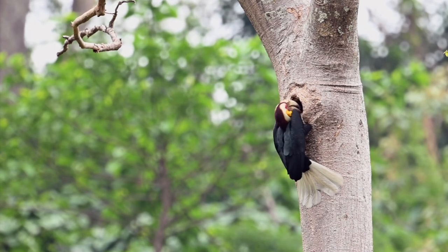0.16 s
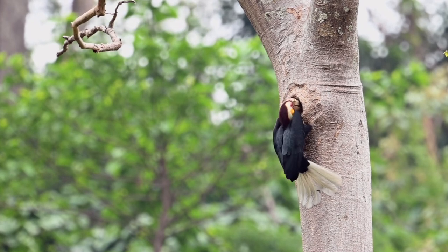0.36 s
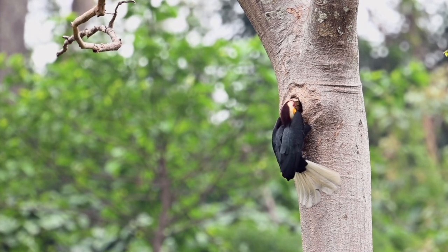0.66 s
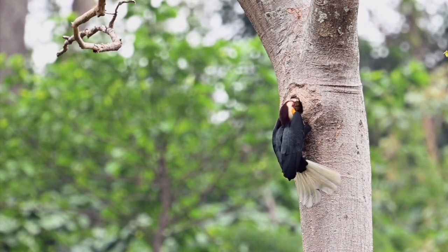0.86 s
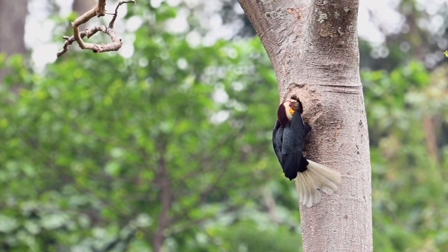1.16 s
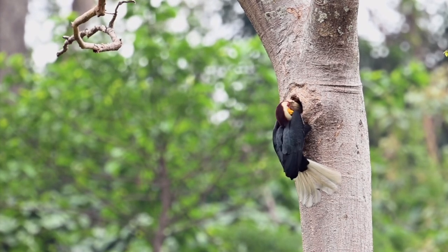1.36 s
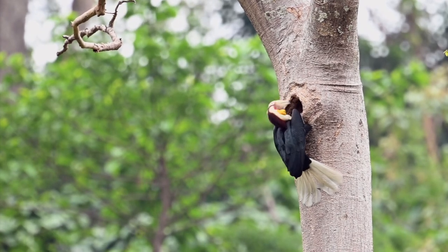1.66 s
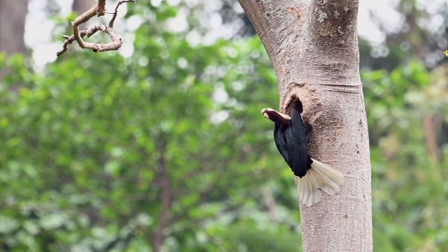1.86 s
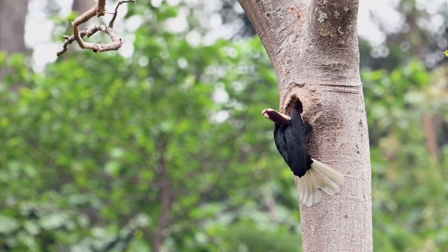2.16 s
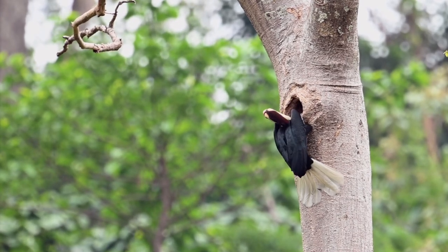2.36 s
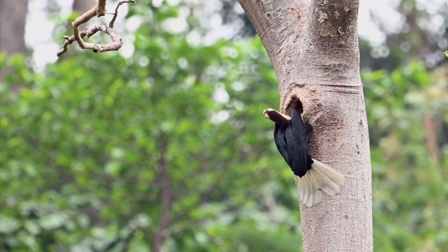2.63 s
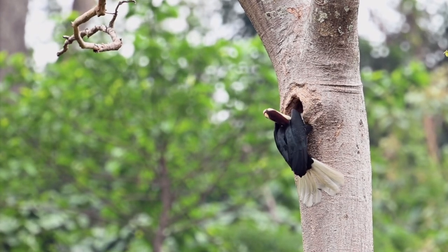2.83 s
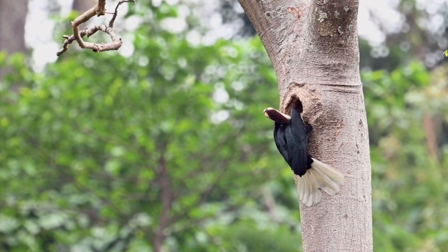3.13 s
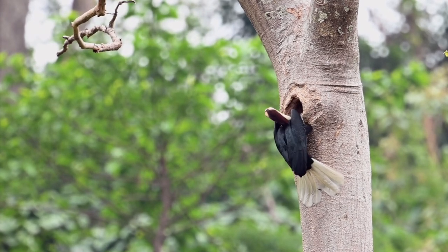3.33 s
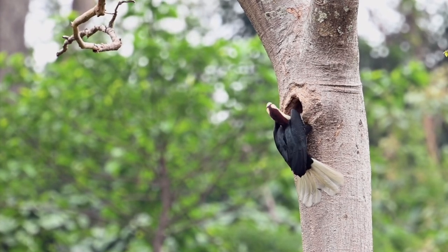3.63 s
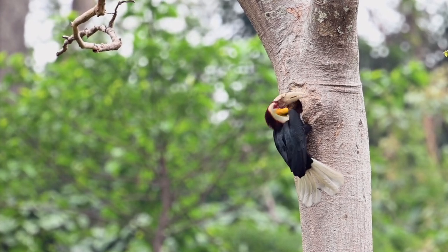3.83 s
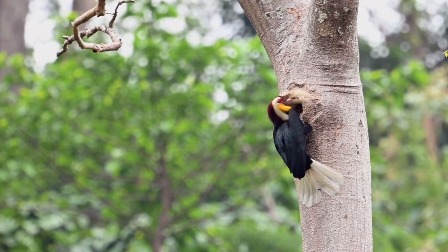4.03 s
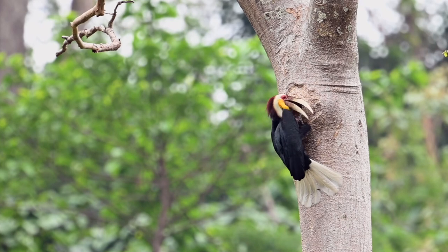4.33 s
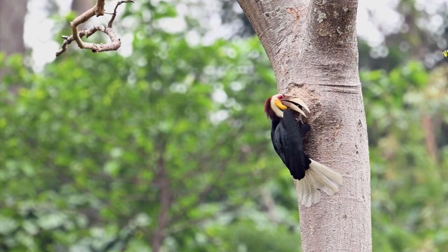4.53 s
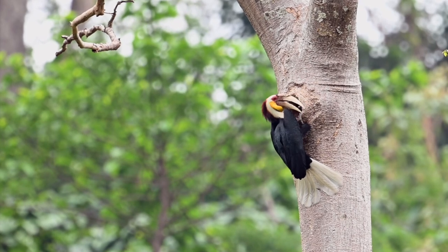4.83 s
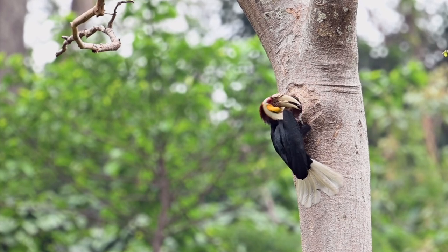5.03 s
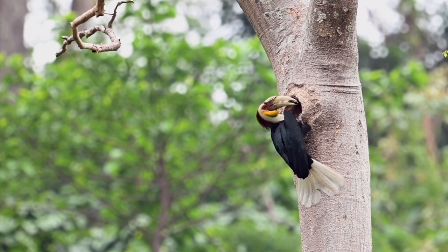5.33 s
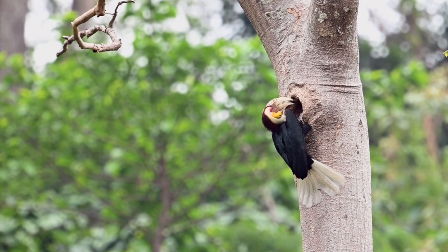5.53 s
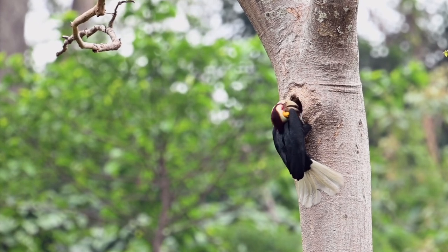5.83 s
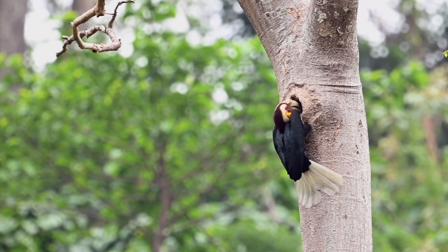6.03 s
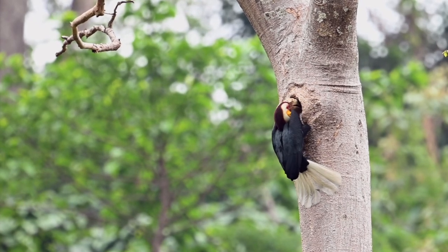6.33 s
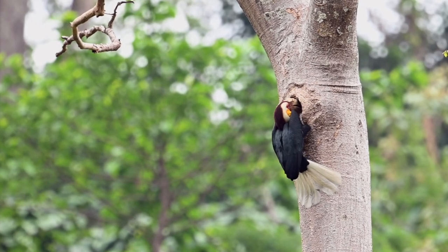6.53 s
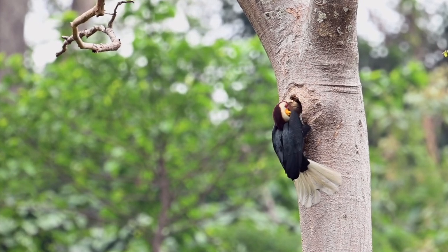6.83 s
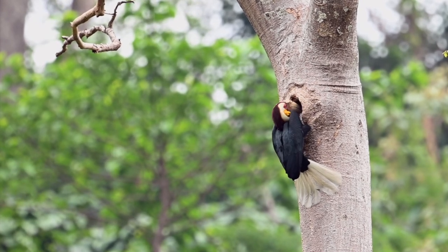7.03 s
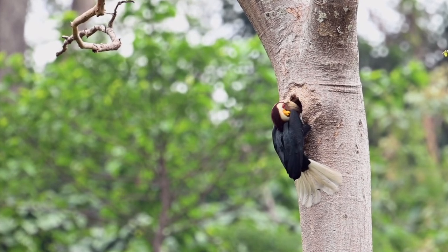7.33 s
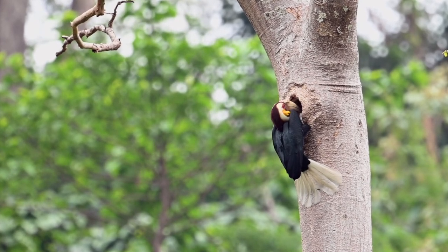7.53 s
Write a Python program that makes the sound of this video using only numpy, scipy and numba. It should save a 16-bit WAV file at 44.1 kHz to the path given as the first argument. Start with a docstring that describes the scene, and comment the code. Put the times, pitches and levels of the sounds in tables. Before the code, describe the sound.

Outdoor forest by day: low wind buffeting, mostly on the left, a shrill throbbing insect chorus, soft leaves and far repeated bird calls.

```python
"""Windy forest at a nest hole

By day, two bare microphone ports of a camera face a nest hole in a tall tree. Filtered noise rumbles and
swung pulses thump as wind on each port; wavering sine songs make a high cicada drone. Gliding tones are far
birds repeating their phrases, and with harmonics a wheezing nestling; scattered noise tails echo them among
the trunks. Banded noise rustles softly as leaves, and a piece of wood ticks once."""
import sys
import numpy as np
from scipy import signal
from scipy.fft import rfft, irfft
from scipy.io import wavfile
from scipy.ndimage import uniform_filter1d
from numba import njit

SR = 44100
rng = np.random.default_rng(int(sys.argv[2]) if len(sys.argv) > 2 else 0)


def transcribe(u):
    """Save the signal u as a 16-bit wav file named by the first command-line argument.

    u: samples, shape (n,) or (channels, n), limited to [-1, 1]; the rate is SR.
    q: integer samples, one column per channel.
    """
    v = np.clip(np.atleast_2d(u).T, -1, 1)
    q = np.round(v * 32767).astype(np.int16)
    wavfile.write(sys.argv[1], SR, q)


N = 338688  # length in samples
RIGHT_SIDE_LAG = 6  # samples by which sound from the right reaches the left port later


def undb(db):
    """Amplitude gain of a level in dB."""
    return 10 ** (np.asarray(db) / 20)


def unit(x):
    """Scales to rms 1, taken over all channels together."""
    return x / np.sqrt(np.mean(x ** 2))


def walk(rate_hz):
    """Slow random wander of rms 1: levels held 1 / rate_hz s, then slewed twice."""
    hold = int(SR / rate_hz)
    steps = np.repeat(rng.standard_normal(N // hold + 1), hold)
    slewed = uniform_filter1d(uniform_filter1d(steps, hold), hold)
    return unit(slewed[:N])


@njit
def lowpass(x, corner_hz, damping):
    """State-variable low-pass whose corner moves every sample."""
    y, band, low = np.empty(len(x)), 0., 0.
    for i in range(len(x)):
        g = np.tan(np.pi * corner_hz[i] / SR)
        v = (band + g * (x[i] - low)) / (1 + g * (g + damping))
        y[i] = low + g * v
        band, low = 2 * v - band, 2 * y[i] - low
    return y


def add(track, start_s, sound):
    """Mixes a sound into a track from its start, cut at the end of the track."""
    i = max(int(start_s * SR), 0)
    track[i:i + len(sound)] += sound[:N - i]


def note(length_s, start_hz, middle_hz, end_hz, edge, knee):
    """Phase and envelope of a glide; the pitch bends smoothly through its three points."""
    u = np.arange(int(length_s * SR)) / (length_s * SR)
    hz = np.interp(u, [0, knee, 1], [start_hz, middle_hz, end_hz])
    hz = uniform_filter1d(hz, len(u) // 5, mode="nearest")
    return 2 * np.pi * np.cumsum(hz) / SR, signal.windows.tukey(len(u), edge)


def phrases(starts, phrase):
    """The notes of a phrase sung at each start, never quite at the same strength."""
    spread_db = 1.7 * rng.standard_normal((len(starts), len(phrase)))
    notes = []
    for (start_s, level_db), row in zip(starts, spread_db):
        for (delay_s, *shape, relative_db), vary_db in zip(phrase, row):
            if start_s + delay_s < N / SR:
                notes.append((start_s + delay_s, *shape, level_db + relative_db + vary_db))
    return notes


def sing(notes, edge, knee=.4, shake_hz=0, flutter_db=0, fade_db=0, harmonics_db=(0,)):
    """Gliding harmonics; a hoarse voice is shaken in pitch and level, a tiring one fades along the note."""
    out = np.zeros(N)
    shake = 2 * np.pi * shake_hz * np.cumsum(walk(200)) / SR  # in radians
    flutter = undb(flutter_db * walk(180))
    for start_s, *shape, level_db in notes:
        phase, envelope = note(*shape, edge, knee)
        wobble = shake[int(start_s * SR):][:len(phase)]
        phase[:len(wobble)] += wobble
        voice = sum(undb(db) * np.sin((k + 1) * phase) for k, db in enumerate(harmonics_db))
        fade = np.linspace(0, fade_db, len(phase))
        add(out, start_s, undb(level_db + fade) * envelope * voice)
    return out * flutter


def forest(x, echo_db, left_lag=RIGHT_SIDE_LAG, ongoing=False):
    """Direct sound comes left_lag samples later on the left; trunks scatter a different tail to each port."""
    t60_s, build_up_s = 1, 0.012
    t = np.arange(SR) / SR
    tails = rng.standard_normal((2, SR)) * undb(-60 * t / t60_s) * np.minimum(t / build_up_s, 1)
    tails *= undb(echo_db) / np.sqrt(np.sum(tails ** 2, axis=1, keepdims=True))
    x = np.append(np.zeros(SR), x)
    if ongoing:  # a steady song already fills the trees: a later second of it leads in and crossfades
        fade = np.clip((SR + 2000 - np.arange(SR + N)) / 2000, 0, 1)
        x = np.sqrt(1 - fade) * x + np.sqrt(fade) * np.roll(x, -2 * SR)
    echo = signal.fftconvolve(x[None], tails, axes=1)
    direct = np.array([x[SR - left_lag:SR - left_lag + N], x[SR:]])
    return direct + echo[:, SR:SR + N]


def leaves():
    """Rustle of noise in half-octave steps that swell together and flicker alone."""
    # colour of the rustle: pitch_hz [Hz], density_db [dB per Hz, relative]
    colour_points = [(50, -11), (200, -9.5), (700, -12), (1100, -12.5), (1400, -17.5), (2700, -20.5),
                     (3250, -16.5), (3500, -14), (4400, -27), (4850, -14), (5250, -23.5), (8200, -22.5),
                     (8500, -26), (15700, -34)]
    level_db = -48.5
    hz, (at_hz, density_db) = np.fft.rfftfreq(N, 1 / SR)[1:], np.transpose(colour_points)
    log_hz = np.log(hz)
    colour = np.append(0, undb(np.interp(log_hz, np.log(at_hz), density_db)))
    octave = np.append(0, np.log2(hz))
    # share of power common to both ports, greatest in the middle of the range
    alike = np.append(0, np.interp(log_hz, np.log([150, 600, 2500, 8000]), [.3, .6, .5, .1]))
    shared, left, right = rfft(rng.standard_normal((3, N)))
    # the low rustle comes from ahead, the high rustle from the right
    lag = RIGHT_SIDE_LAG * np.interp(log_hz, np.log([1300, 3000]), [0, 1])
    late = np.exp(-2j * np.pi * np.append(0, hz * lag) / SR)
    common = np.sqrt(alike) * shared * np.array([late, np.ones_like(late)])
    ports = colour * (common + np.sqrt(1 - alike) * np.array([left, right]))
    out, swell = 0, walk(0.19)
    for centre in np.arange(7, 14.5, .5):  # in octaves above 1 Hz
        band = np.cos(np.pi * np.clip(octave - centre, -.5, .5)) ** 2
        out = out + undb(.5 * swell + 1.21 * walk(8)) * irfft(ports * band, N)
    return unit(out) * undb(level_db + np.array([[.6], [-.6]]))  # a little stronger on the left


def ticks():
    """A millisecond or two of ringing wood: a sine that builds and dies at once."""
    # dry ticks: start_s [s], ring_hz [Hz], level_db [dB ahead of the envelope], left_minus_right_db [dB]
    knocks = [(6.338, 2360, -25.5, -3)]
    out, t = np.zeros((2, N)), np.arange(400) / SR
    for start_s, hz, level_db, pan_db in knocks:
        ring = t / 0.00065 * np.exp(1 - t / 0.0003) * np.sin(2 * np.pi * hz * t)
        add(out[0], start_s, undb(level_db + pan_db / 2) * ring)
        add(out[1], start_s, undb(level_db - pan_db / 2) * ring)
    return out


def cicadas():
    """Songs climb in pitch and throb with every pump of the abdomen, then echo among the trunks."""
    # the singers: song_hz [Hz], level_db [dB, relative], pitch_swing [share of the pitch]
    singers = [(3985, 1, .007), (4090, 3, .006), (4058, -2, .005), (4010, -2, .005), (4122, -10, .004),
               (3935, -10, .007), (3885, -16, .007), (3845, -15, .007), (3805, -17, .005),
               (3685, -26, .005), (3605, -30, .006)]
    # multiples of the first singer's clicks: multiple [of click rate], level_db [dB peak before flicker]
    overtone_levels = [(11, -72), (12, -69), (13, -68), (14, -68), (16, -78), (18, -79), (19, -82)]
    # the chorus swells and sinks: time_s [s], level_db [dB rms before throb changes and echo average in]
    chorus = [(0, -33), (.4, -37.5), (1.5, -37), (3, -38), (3.8, -36.5), (4.3, -39), (4.8, -36), (5.6, -39),
              (6.7, -37), (7.2, -39), (7.68, -36)]
    pump_hz = 8.6  # mean rate
    songs, t = np.zeros((2, N)), np.arange(N) / SR
    for k, (hz, db, swing) in enumerate(singers):
        pump = (pump_hz * t + 0.1575 * walk(0.98) + rng.random()) % 1  # position within one pump
        bend = uniform_filter1d(2 * pump - 1, 600) + .4 * walk(40) + .15 * walk(1.5)
        phase = 2 * np.pi * np.cumsum(hz * (1 + swing * bend)) / SR
        throb = undb(1.5 * np.sin(2 * np.pi * pump) + .7 * walk(3))
        songs[int(hz > 4000)] += throb * undb(db) * np.sin(phase)  # lower and higher songs apart
        if k == 0:
            clicks = phase / 5  # it clicks at a fifth of its song pitch
            overtones = throb * sum(undb(level + 3.1 * walk(5.5)) * np.sin(multiple * clicks)
                                    for multiple, level in overtone_levels)
    lower, higher = unit(songs) / np.sqrt(2) * undb(np.interp(t, *np.transpose(chorus)))
    drone = forest(lower, echo_db=1, left_lag=6, ongoing=True)
    drone += forest(higher, echo_db=0, left_lag=7, ongoing=True)
    drone += forest(overtones, echo_db=-2, ongoing=True)
    return drone * undb([[.8], [-.8]])


def hoarse_callers():
    """Stray calls far off: glides so strongly shaken in pitch and level that they turn hoarse."""
    # start_s [s], length_s [s], start_hz, middle_hz, end_hz [Hz], level_db [dB before flutter and echo]
    calls = [(3.47, 0.08, 2850, 3030, 2660, -51), (3.72, 0.17, 5800, 5550, 5250, -56.5),
             (5.46, 0.044, 6290, 5540, 5280, -56), (6.245, 0.046, 6020, 5740, 5640, -56),
             (6.345, 0.0534, 6250, 6000, 5760, -53), (6.92, 0.09, 2670, 3180, 3280, -53)]
    return forest(sing(calls, edge=.4, shake_hz=170, flutter_db=5), echo_db=-2)


def high_singer():
    """A breathy far voice: a low lead-in, then notes that drop fast and hold, mostly stepping upward."""
    # one phrase: delay_s [s], length_s [s], start_hz, middle_hz, end_hz [Hz], level_db [dB, relative]
    high_notes = [(-.15, .15, 5750, 5440, 5480, -5), (0, .105, 6780, 5890, 5630, -1.5),
                  (0.141, 0.096, 6880, 6060, 5850, -1), (0.272, .082, 7000, 6170, 5920, 3.5),
                  (.407, .09, 6800, 6300, 6290, -2), (0.547, .039, 6730, 6650, 6900, -6)]
    # phrase starts: start_s [s], level_db [dB ahead of the note levels]
    high_starts = [(2.455, -50.5), (7.448, -48)]
    song = sing(phrases(high_starts, high_notes), edge=.2, knee=.3, shake_hz=45, flutter_db=4)
    return forest(song, echo_db=-2)


def chipping_bird():
    """A far bird in strict time: falling chips that fade along each note."""
    # one phrase: delay_s [s], length_s [s], start_hz, middle_hz, end_hz [Hz], level_db [dB, relative]
    chip_notes = [(0, .022, 2230, 1600, 1400, 0), (0.054, .032, 2200, 1500, 1450, 0),
                  (.163, .024, 2260, 1600, 1480, 1), (.225, .042, 2000, 1560, 1560, 0)]
    # one column, a row for each phrase in turn: level_db [dB ahead of the note levels and port gains]
    chip_levels = [-49, -47, -50, -50.5, -53, -56, -50, -49.5, -55, -53, -53.5, -51.5]
    first_s, every_s = .381, .6015
    chip_starts = [(first_s + k * every_s, level_db) for k, level_db in enumerate(chip_levels)]
    notes = phrases(chip_starts, chip_notes)
    song = sing(notes, edge=0.3, knee=.6, shake_hz=25, flutter_db=2, fade_db=-8)
    return forest(song, echo_db=-2, left_lag=2) * undb([[.5], [4]])  # stronger on the right


def barbet():
    """A far barbet repeats a phrase of short, mostly falling glides with a slight shake."""
    # one phrase: delay_s [s], length_s [s], start_hz, middle_hz, end_hz [Hz], level_db [dB, relative]
    barbet_notes = [(-.08, 0.033, 874, 901, 926, 1), (0, 0.0349, 1279, 1304, 843, 11.5),
                    (0.073, .027, 1260, 1120, 950, 9), (0.139, 0.0409, 1201, 1031, 961, 11)]
    # phrase starts: start_s [s], level_db [dB ahead of the note levels]
    barbet_starts = [(.42, -58.5), (.585, -65), (1.075, -62.5), (1.16, -65.5), (1.705, -62.5), (1.81, -65),
                     (2.2, -70), (2.345, -56), (3.003, -57), (3.662, -59), (4.32, -59), (4.98, -58),
                     (5.655, -54), (6.322, -56.5), (6.47, -67), (6.988, -58.5), (7.13, -66), (7.345, -69)]
    song = sing(phrases(barbet_starts, barbet_notes), edge=0.21, shake_hz=35, flutter_db=1.5)
    return forest(song, echo_db=-0.5, left_lag=0)


def whistling_birds():
    """Clear whistles of small birds: nearly steady glides with little echo."""
    # start_s [s], length_s [s], start_hz, middle_hz, end_hz [Hz], level_db [dB before flutter and echo]
    whistle_notes = [(0.417, 0.037, 1886, 2080, 2190, -52), (0.501, .04, 1990, 2100, 2100, -59),
                     (0.557, 0.18, 2330, 2290, 2410, -57.5), (0.777, 0.085, 2380, 2280, 2340, -58),
                     (.8, 0.037, 2590, 2530, 2440, -54), (.9, 0.058, 2500, 2520, 2500, -60),
                     (2.2, 0.18, 1950, 2150, 2200, -57), (4.569, 0.024, 2280, 2230, 2344, -54),
                     (4.612, 0.059, 2350, 2400, 2600, -55), (4.665, 0.105, 2590, 2644, 2690, -47.5),
                     (4.752, .035, 2690, 2670, 2470, -50.5), (4.612, 0.061, 2800, 2950, 3090, -55),
                     (4.768, 0.052, 3120, 2920, 2940, -54), (4.785, 0.0705, 3440, 3400, 3680, -52)]
    return forest(sing(whistle_notes, edge=.3, shake_hz=7, flutter_db=1.5), echo_db=-12, left_lag=3)


def nestling():
    """A wheeze of four harmonics, unsteady in pitch and level."""
    # start_s [s], length_s [s], start_hz, middle_hz, end_hz [Hz], level_db [dB ahead of the harmonics]
    wheeze_notes = [(0, 0.046, 1590, 1590, 1530, -57), (.55, 0.41, 1593, 1600, 1496, -57.5),
                    (2.901, 0.65, 1494, 1540, 1493, -57.5), (5.642, .48, 1623, 1536, 1447, -53),
                    (6.854, 0.2, 1497, 1565, 1590, -59.5)]
    # one column, a row for each harmonic from the first: level_db [dB, relative]
    wheeze_harmonics = [-5.5, -10, -7, -6]
    voice = sing(wheeze_notes, edge=.15, knee=.7, shake_hz=48, flutter_db=3.5,
                 harmonics_db=wheeze_harmonics)
    return forest(voice, echo_db=0, left_lag=0)


def gusts(port):
    """Wind strength in dB on one port: each gust swells out of the calm, holds and dies away."""
    # gusts over a port: start_s [s], length_s [s], level_db [dB, nominal rms], port [0 left, 1 right]
    gust_list = [(0, 0.083, -29, 0), (0.11, 0.28, -34, 0), (0.562, 0.59, -35.5, 0), (1.406, 0.15, -30, 0),
                 (1.698, 0.14, -33, 0), (2.068, 0.19, -38.5, 0), (2.52, 0.1, -32.5, 0),
                 (2.759, 0.22, -30, 0), (3.113, 0.38, -28.5, 0), (3.548, .18, -35, 0),
                 (3.854, 0.27, -31, 0), (4.276, 0.28, -32, 0), (4.827, 0.41, -35, 0), (5.335, 1.2, -34, 0),
                 (6.669, 0.16, -29.5, 0), (6.976, 0.27, -30.5, 0), (7.302, 0.47, -32.5, 0),
                 (.35, 0.14, -45.5, 1), (0.595, 0.19, -38.5, 1), (.86, .3, -40, 1), (1.348, 0.47, -43, 1),
                 (3.29, 0.13, -28.5, 1), (3.575, 0.15, -40.5, 1), (4.166, 0.17, -33, 1),
                 (4.418, 0.26, -43, 1), (4.81, 0.29, -41, 1), (5.444, 0.1, -35.5, 1),
                 (5.74, 0.49, -36.5, 1), (6.499, 0.22, -39.5, 1), (6.9, 0.3, -40, 1), (7.37, .3, -39, 1)]
    # the breeze between gusts, one column, left then right: level_db [dB, nominal rms]
    calm_levels = [-48.5, -53.5]
    rise_s, fall_s = 0.039, 0.055  # time to gain or lose 10 dB before and after a gust
    t, power = np.arange(N) / SR, undb(2 * calm_levels[port])
    for start_s, length_s, level_db, side in gust_list:
        if side == port:
            before = np.maximum(start_s - t, 0) / rise_s
            after = np.maximum(t - start_s - length_s, 0) / fall_s
            power = power + undb(2 * level_db - 20 * (before + after))
    return 10 * np.log10(power)


def rumble(port):
    """Turbulence on one port: low-passed noise, louder and reaching higher in a stronger gust."""
    strength_db = gusts(port) + 1.2 * walk(7)
    corner_hz = 25 + 105 * undb(0.73 * (strength_db + 30.5))
    noise = lowpass(rng.standard_normal(N), corner_hz, 0.74)
    noise = lowpass(noise, 1.7 * corner_hz, 2.3)
    # a wider band passes more noise: even that out
    return undb(strength_db + 4.6 * walk(27)) * unit(noise / np.sqrt(corner_hz))


def buffets():
    """Strong eddies bursting on a port: each sucks, flips over quickly, then swings ever slower as it leaves."""
    # the eddies: flip_s [s], level_db [dB, nominal peak], pitch_hz [Hz, nominal], port [0 left, 1 right]
    eddies = [(0.032, -16.5, 93, 0), (0.729, -21, 91, 0), (1.062, -19.5, 80, 0), (1.497, -21, 83, 0),
              (1.519, -21, 260, 0), (1.533, -16, 95, 0), (1.759, -22, 133, 1), (2.765, -21.5, 108, 0),
              (2.903, -14, 237, 0), (2.94, -21, 190, 0), (3.177, -16.5, 157, 0), (3.309, -12.5, 276, 0),
              (3.332, -20, 150, 1), (3.37, -20, 148, 1), (3.386, -18.5, 107, 0), (3.44, -17.5, 92, 0),
              (3.473, -12, 131, 0), (4.071, -18, 136, 0), (4.269, -23, 102, 1), (4.318, -9, 289, 0),
              (4.331, -18, 150, 0), (4.514, -19, 104, 0), (4.533, -19, 95, 0), (4.561, -18.5, 102, 0),
              (5.479, -16.5, 94, 0), (5.52, -26, 150, 1), (5.673, -18, 100, 0), (5.734, -17, 122, 0),
              (5.748, -25, 250, 0), (5.985, -20.5, 107, 0), (6.412, -21.5, 76, 0), (6.694, -21, 117, 0),
              (6.785, -17.5, 127, 0), (7.034, -17.5, 131, 0), (7.073, -12.5, 126, 0), (7.097, -22.5, 93, 1),
              (7.176, -21, 98, 0), (7.635, -18.5, 81, 0)]
    out = np.zeros((2, N))
    signs = rng.choice([-1, 1], len(eddies))
    for (flip_s, level_db, hz, port), sign in zip(eddies, signs):
        t = np.arange(-2 * SR / hz, 4 * SR / hz) * hz / SR  # in cycles
        swing = sign * np.sin(2 * np.pi * 1.064 * np.arcsinh(1.585 * t) / 1.47)
        swing *= np.exp(-(t / np.where(t < 0, .6, 1.1)) ** 2)
        add(out[port], flip_s - 2 / hz, undb(level_db) * swing)
    return out


def wind():
    """Unrelated rumble on the two ports with eddies on top; the camera's input rolls off the deepest bass."""
    on_ports = np.array([rumble(0), rumble(1)]) + buffets()
    return signal.sosfilt(signal.butter(2, 40, "high", fs=SR, output="sos"), on_ports)


def scene():
    """Sums the layers; each voice has its own lag between the ports and its own share of echo."""
    background = leaves() + ticks() + cicadas()
    far_birds = hoarse_callers() + high_singer() + chipping_bird() + barbet() + whistling_birds()
    return background + far_birds + nestling() + wind()


def record(dry):
    """The camera's input flattens peaks above its overload amplitude and cuts the top of the treble."""
    overload, top_hz = .32, 15720
    flattened = np.clip(dry, -overload, overload)
    return signal.sosfilt(signal.ellip(12, .2, 80, top_hz, fs=SR, output="sos"), flattened)


dry = scene()
out = record(dry)
transcribe(out)
```